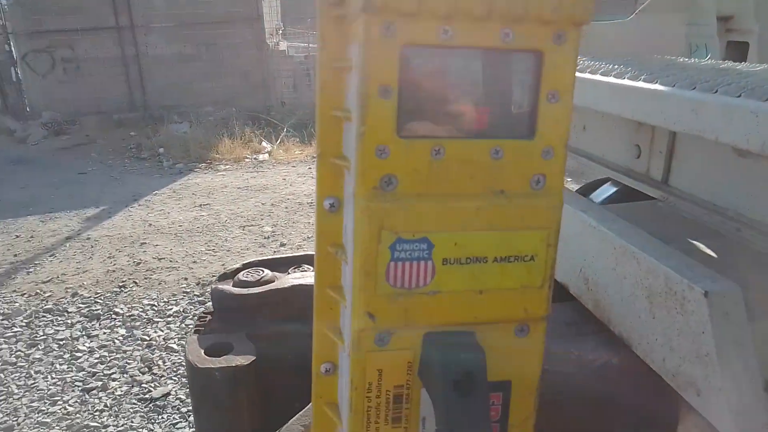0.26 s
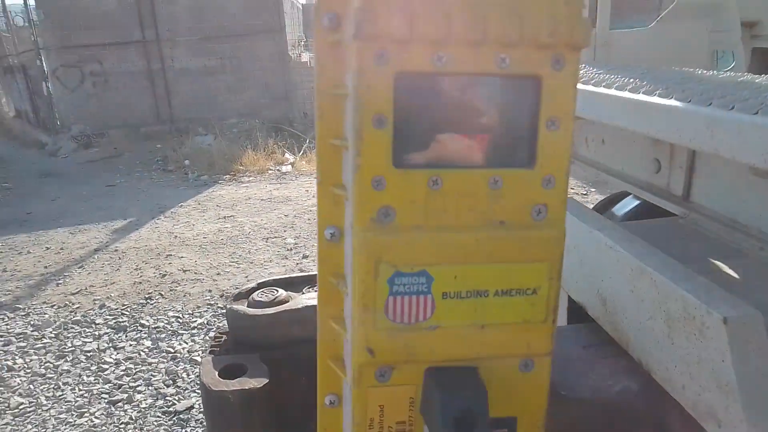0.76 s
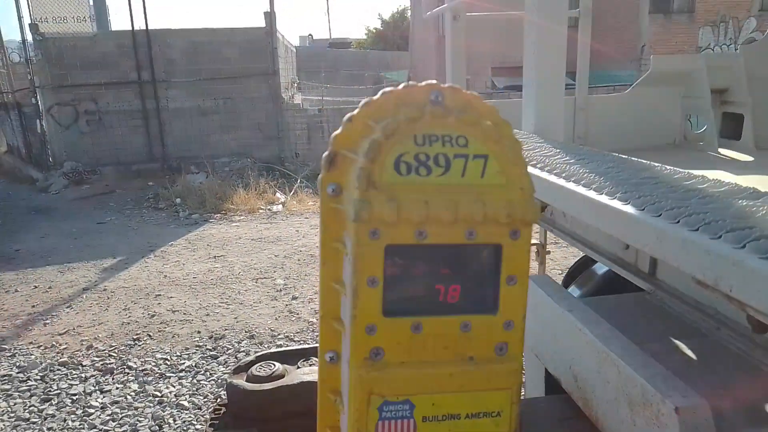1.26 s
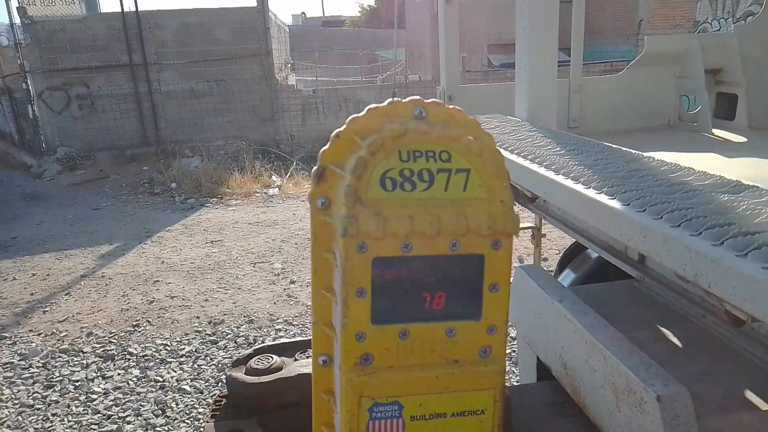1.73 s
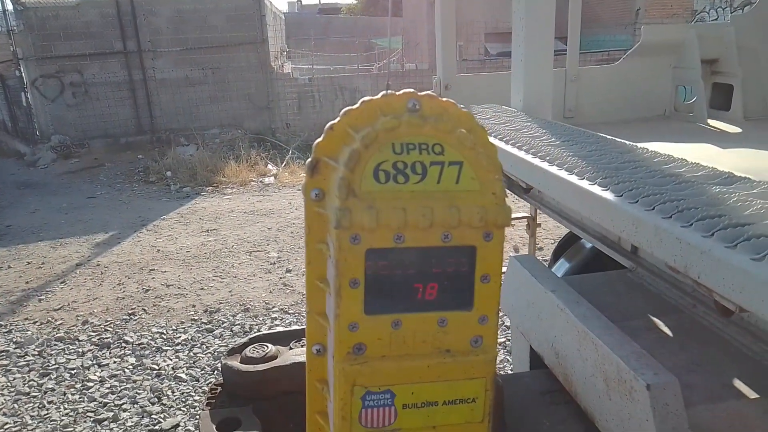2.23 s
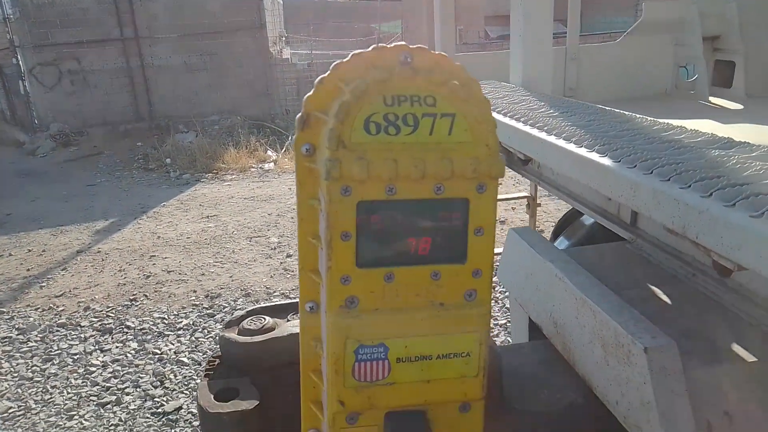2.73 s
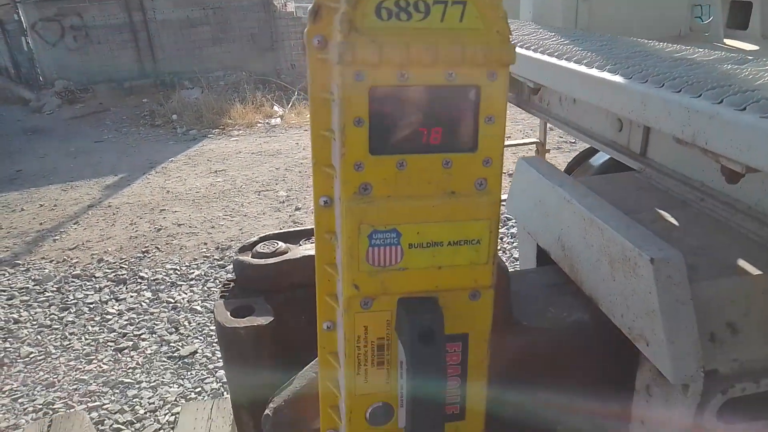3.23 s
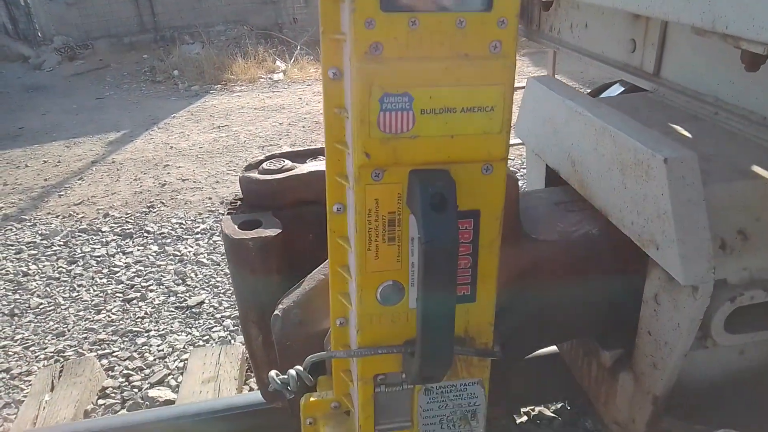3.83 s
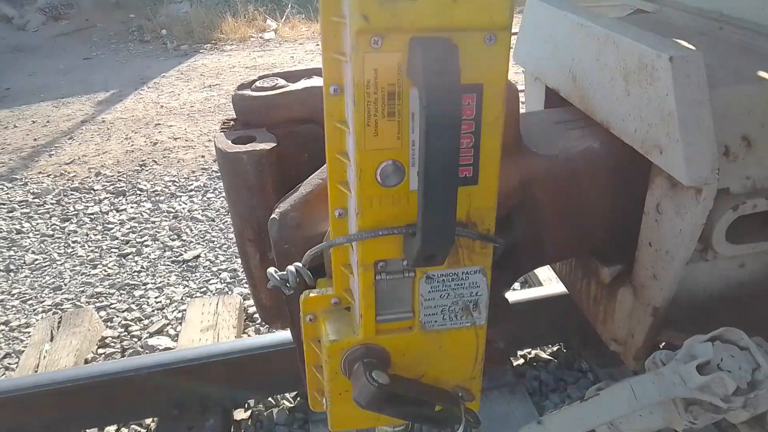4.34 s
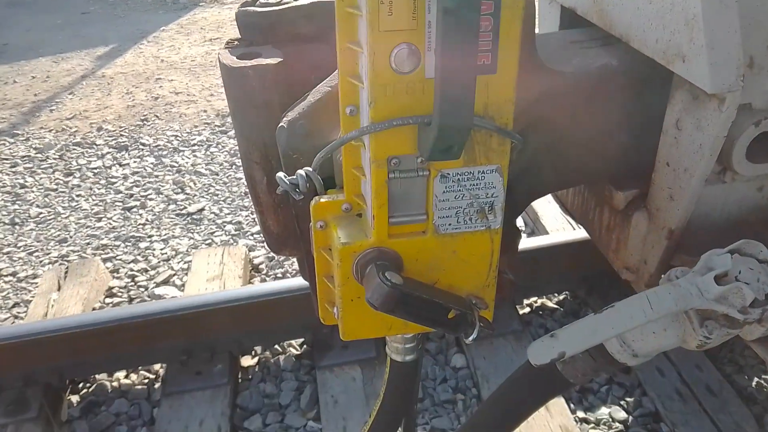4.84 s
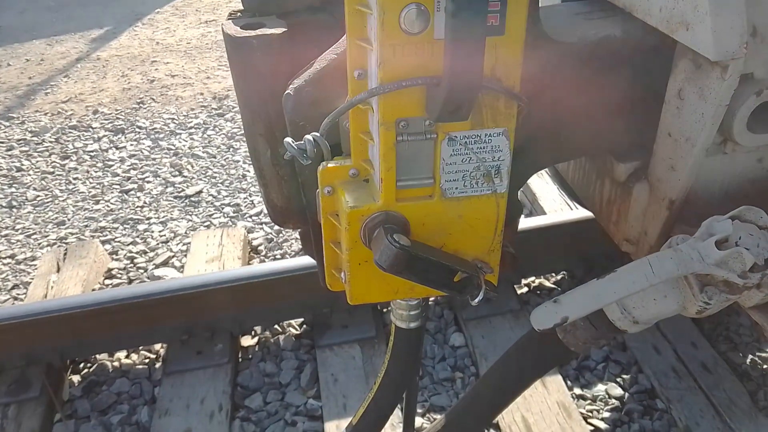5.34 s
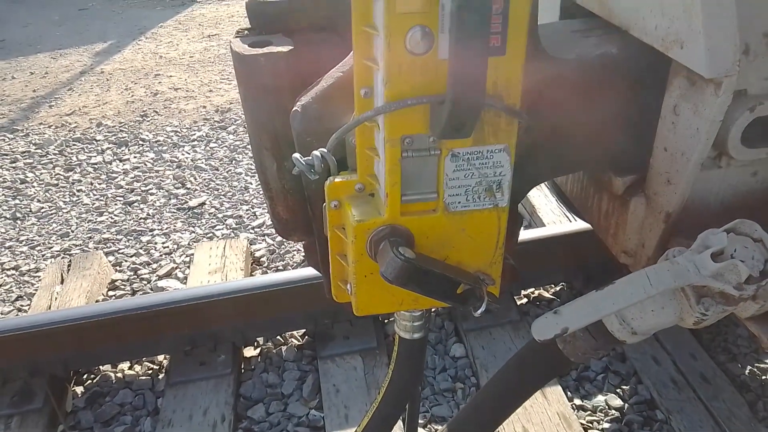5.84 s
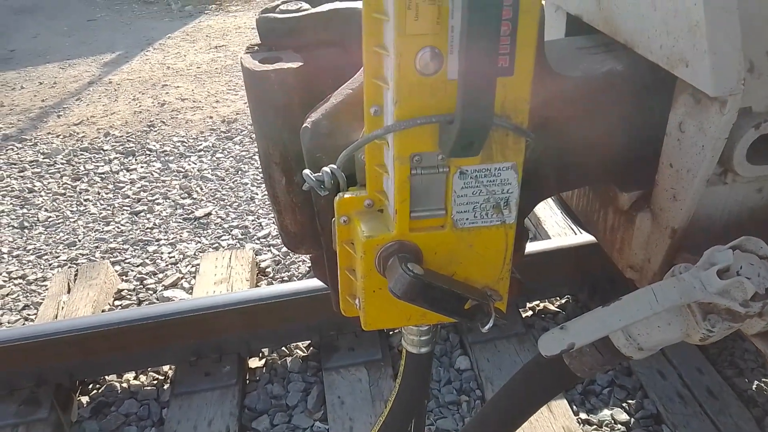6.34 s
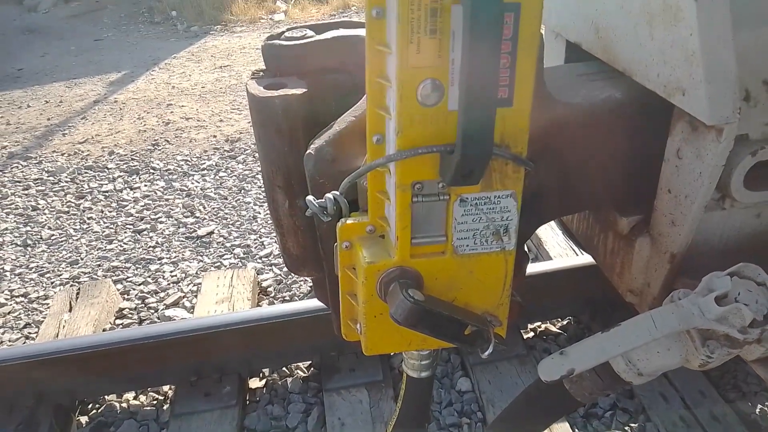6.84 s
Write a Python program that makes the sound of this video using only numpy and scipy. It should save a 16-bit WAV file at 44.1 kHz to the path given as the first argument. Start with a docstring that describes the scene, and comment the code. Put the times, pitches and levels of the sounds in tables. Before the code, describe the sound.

Outdoors beside a parked freight train, a small air turbine in a metal box gives a thin, steady high whine over a continuous muffled rush of exhaust air. The whine swells and weakens as the handheld microphone moves close around the box, nearly vanishing just before the middle, then returning. Faint treble hiss flickers above; low yard rumble and a wavering distant engine hum lie underneath.

```python
"""A small air turbine whines in a box at the end of a freight train, run by brake-pipe air, heard from a moving hand.
The 25 blades sing as a sine with a fainter neighbour, amid noise beside the tone and faint shaft harmonics.
The exhaust is broad rushing noise, muffled steeply above a wandering edge; over it lies a faint treble hiss.
Narrow strips of the sound surface and sink. Behind, the yard rumbles as low noise and a distant engine
hums as two wavering sines."""
import sys
import numpy as np
from scipy import signal
from scipy.io import wavfile
from scipy.ndimage import uniform_filter1d, map_coordinates

SR = 44100
rng = np.random.default_rng(int(sys.argv[2]) if len(sys.argv) > 2 else 0)


def generate_wav(signal):
    """Clip the signal to [-1, 1] and save it as 16-bit WAV at the path in sys.argv[1]."""
    frames = np.transpose(np.atleast_2d(signal))
    scaled = np.clip(frames, -1, 1) * 32767
    pcm = np.round(scaled).astype(np.int16)
    wavfile.write(sys.argv[1], SR, pcm)


N = 312228  # length [samples]
FRAME = 2048  # analysis frame [samples]
HOP_OVERLAP = FRAME * 3 // 4
BIN_HZ = SR / FRAME
HZ = np.arange(FRAME // 2 + 1)[:, None] * BIN_HZ + 1e-3  # just above zero, so its log is finite


def undb(db):
    """Turn decibels into gain."""
    return 10 ** (np.asarray(db) / 20)


def columns(table, s):
    """Read every column after the time column at times s, in straight lines between points."""
    table = np.array(table)
    return [np.interp(s, table[:, 0], column) for column in table.T[1:]]


def colour(table):
    """Read a spectrum table at every analysis frequency, in dB over log frequency."""
    table = np.array(table)
    return np.interp(np.log(HZ), np.log(table[:, 0]), table[:, 1])


def shape(x, db_of):
    """Filter x by a gain in dB that depends on frequency and time."""
    _, s, spectrum = signal.stft(x, SR, nperseg=FRAME, noverlap=HOP_OVERLAP)
    shaped = spectrum * undb(db_of(s))
    return signal.istft(shaped, SR, nperseg=FRAME, noverlap=HOP_OVERLAP)[1][:N]


def white():
    """Make flat noise of power 1 in each Hz."""
    return rng.standard_normal(N) * np.sqrt(SR / 2)


def walk(rate):
    """Wander in straight ramps between random levels, rate of them a second."""
    k = int(SR / rate)
    held = np.repeat(rng.standard_normal(N // k + 1), k)
    return 1.072 * uniform_filter1d(held, k)[:N]


BLOTCH_HZ, BLOTCH_S = 90, .2  # patch size [Hz], [s]


def blotches(s, spread_db):
    """Mottle noise with random dB over frequency and time, alike within a small patch."""
    rows, cols = int(SR / 2 / BLOTCH_HZ) + 2, int(s[-1] / BLOTCH_S) + 2
    grid = rng.standard_normal((rows, cols))
    return spread_db * map_coordinates(grid, np.broadcast_arrays(HZ / BLOTCH_HZ, s / BLOTCH_S), order=1)


# colour of the yard rumble: (frequency [Hz], level [dB per Hz])
RUMBLE_COLOUR = [(20, -89), (40, -77), (80, -66), (120, -56.5), (140, -58.5), (190, -62.5), (220, -59.5),
                 (270, -67), (400, -78), (1500, -130)]


def yard_rumble():
    """Low blotchy noise: the blurred bed of the distant yard."""
    return shape(white(), lambda s: colour(RUMBLE_COLOUR) + blotches(s, spread_db=4.0))


# upper engine hum, before its waver: (time [s], level [dB])
UPPER_HUM_LEVEL = [(0, -54), (1.2, -53), (1.8, -42), (2.25, -49), (2.5, -35.5), (3.2, -37), (3.7, -41.5),
                   (3.9, -50), (4.5, -40.5), (5.1, -48), (5.4, -40.5), (6.1, -47.5), (7.08, -43)]
# bumps added to the lower engine hum: (peak time [s], time from peak to 1/e [s], level [dB])
LOWER_HUM_SWELLS = [(.3, 0.4, -37), (2.11, 0.21, -35), (2.7, 0.17, -47), (3.57, .1, -43)]
UPPER_HUM_START_HZ, UPPER_HUM_SAG_HZ_PER_S, UPPER_HUM_WAVER_DB = 168, 1.7, 1.5
LOWER_HUM_HZ, LOWER_HUM_WAVER_HZ, LOWER_HUM_BASE_DB = 118, 7, -48.5


def distant_engine(t):
    """Two sines: the upper sags in pitch and wavers in level, the lower wavers in pitch and swells."""
    upper_hz = UPPER_HUM_START_HZ - UPPER_HUM_SAG_HZ_PER_S * t
    upper = np.sin(2 * np.pi * np.cumsum(upper_hz) / SR)
    upper_gain = undb(columns(UPPER_HUM_LEVEL, t)[0] + UPPER_HUM_WAVER_DB * walk(6))
    lower_hz = LOWER_HUM_HZ + LOWER_HUM_WAVER_HZ * walk(12)
    lower = np.sin(2 * np.pi * np.cumsum(lower_hz) / SR)
    lower_gain = undb(LOWER_HUM_BASE_DB)
    for peak, half, db in LOWER_HUM_SWELLS:
        lower_gain = lower_gain + undb(db) * np.exp(-((t - peak) / half) ** 2)
    return np.sqrt(2) * (upper_gain * upper + lower_gain * lower)  # levels are RMS


# colour of the faint hiss: (frequency [Hz], level [dB per Hz])
HISS_COLOUR = [(1500, -88), (2150, -90), (2900, -96.5), (3450, -91), (4700, -98), (5700, -101),
               (5950, -104), (6400, -98.5), (8700, -98.5), (9400, -102), (10150, -108), (11000, -103),
               (12000, -99), (16000, -100.5)]


def treble_hiss():
    """Faint treble air: noise, blotchy in pitch, that flickers a little as a whole."""
    flicker = undb(.7 * walk(24))
    return shape(white() * flicker, lambda s: colour(HISS_COLOUR) + blotches(s, spread_db=2.5))


# colour of the exhaust, relative only: (frequency [Hz], level [dB per Hz])
RUSH_COLOUR = [(150, -39), (260, -8), (391, -8.5), (598, -4.5), (649, -6), (891, 0), (993, 0.5), (1080, 2),
               (1900, -4), (2470, -16), (4180, -120)]
# overall exhaust level, before the muffling and blotches: (time [s], level [dB])
RUSH_LEVEL = [(0, -30), (1.56, -29), (3.8, -30), (4.4, -32), (5.2, -29.5), (5.6, -31.5), (7.08, -31)]
# wandering edge above which the noise is muffled: (time [s], frequency [Hz])
MUFFLE_EDGE = [(0, 1900), (.6, 1810), (1.05, 2044), (1.5, 2090), (1.95, 1980), (2.25, 2070), (2.75, 2006),
               (3.1, 1880), (4.25, 1850), (4.75, 1740), (5.7, 1790), (6.25, 1660), (6.75, 1850),
               (7.08, 1770)]
MUFFLE_HZ_PER_DB = 8  # each 8 Hz higher costs 1 dB


def exhaust_rush():
    """Exhaust air: broad rushing noise, muffled steeply above a wandering edge."""
    def db_of(s):
        fall_start_hz = columns(MUFFLE_EDGE, s)[0] - 90
        above_hz = np.maximum(HZ - fall_start_hz, 0)
        total_db = 10 * np.log10(np.sum(undb(2 * colour(RUSH_COLOUR))) * BIN_HZ)
        level = colour(RUSH_COLOUR) - total_db + columns(RUSH_LEVEL, s)[0]
        return level - above_hz / MUFFLE_HZ_PER_DB + blotches(s, spread_db=2.0)
    return shape(white(), db_of)


# narrow strips that surface (+) or sink (-): (start time [s], end time [s], centre [Hz], change [dB])
STRIP_MOVES = [(0, .95, 3340, 14), (0, .3, 3700, 13), (0, .65, 6150, 24), (0, .65, 6880, 12),
               (0, .4, 11310, 16), (0, 0.597, 12370, 23), (0, .75, 15660, 21), (.55, .88, 8930, 17),
               (.68, 1.12, 11290, 19), (0.744, 1.195, 380, -7), (.85, 1.28, 12300, 16),
               (1.2, 2.2, 7590, 10), (1.85, 2.5, 8905, 18.5), (2.4, 2.95, 6180, 23),
               (2.55, 3.22, 7570, 22.5), (2.545, 3.875, 11515, 24), (2.6, 7.1, 6900, 12),
               (2.6, 4.2, 3360, 8.5), (3.45, 7.1, 4040, 5.5), (5.2, 5.6, 4020, 7), (6.5, 6.8, 4000, 7),
               (3.55, 4.1, 1900, -2), (3.6, 4.3, 60, -2.5), (5.3, 6.1, 70, 2.5), (1.7, 1.9, 330, -6),
               (5.9, 6.5, 1750, -3), (3.1, 7.1, 5790, -7), (5.55, 6.0, 470, 4.5), (6.65, 6.85, 487, 7),
               (0, .2, 400, -6.5), (3.78, 4.02, 2090, 15), (3.65, 4.08, 7640, 20),
               (3.802, 4.35, 11300, 21.5), (4.075, 4.45, 484, -12.5), (4.595, 5.148, 458, -10),
               (4.35, 4.85, 8860, 14), (4.448, 4.85, 12560, 20), (4.4, 5.9, 15500, 18),
               (5.75, 6.5, 1883, 18), (6.0, 6.6, 348, -2), (6.8, 7.1, 11320, 14)]
STRIP_WIDTH_HZ, FADE_S = 162, 0.16  # width is two standard deviations; fades centre on start and end


def strips(s):
    """Gain in dB of strips that surface and sink, each fluttering on its own."""
    db = 0
    flutter = uniform_filter1d(rng.standard_normal((len(STRIP_MOVES), len(s))), size=8)
    for (start, end, hz, change_db), shake in zip(STRIP_MOVES, flutter):
        fade = np.clip(np.minimum(s - start, end - s) / FADE_S + .5, 0, 1)
        bell = np.exp(-(2 * (HZ - hz) / STRIP_WIDTH_HZ) ** 2 / 2)
        db = db + change_db * fade * (1 + 0.38 * shake) * bell
    return db


# pitch of the blade tone, shifted slightly by the moving hand: (time [s], frequency [Hz])
BLADE_PITCH = [(0, 5431.4), (.5, 5430.3), (3.8, 5433), (4.5, 5431), (6.4, 5431.1), (7.08, 5430)]
BLADES = 25


def shaft_turn(t):
    """Shaft angle in radians: one turn passes every blade once."""
    return 2 * np.pi * np.cumsum(columns(BLADE_PITCH, t)[0]) / SR / BLADES


# faint shaft harmonics, about which each wanders: (multiple of shaft rate, level [dB])
SHAFT_HARMONICS = [(1, -52), (3, -50), (4, -47), (6, -46), (15, -79), (17, -77), (22, -78), (23, -80),
                   (26, -67), (31, -80), (35, -80), (41, -80), (43, -80), (47, -84), (49, -78), (50, -74),
                   (51, -82), (52, -80), (53, -80), (54, -81), (56, -79), (57, -81), (58, -82), (60, -81),
                   (61, -80), (72, -82)]


def shaft_harmonics(turn):
    """Sines on whole multiples of the shaft rate, each wandering in level."""
    total = 0
    for multiple, db in SHAFT_HARMONICS:
        start_phase = 2 * np.pi * rng.random()
        total = total + undb(db + 2.7 * walk(3.06)) * np.sin(multiple * turn + start_phase)
    return np.sqrt(2) * total  # levels are RMS


# noise bands just below and just above the blade tone: (low [Hz], high [Hz])
SIDE_BANDS = [(5150, 5378), (5430, 5593)]
# beside the blade tone; noise levels are for the band alone, before blotches:
# (time [s], next lower shaft harmonic level [dB], noise below level [dB], noise above level [dB])
BESIDE_TONE = [(0, -57, -59, -54), (.3, -58, -53, -49), (.8, -41, -49, -59), (1.0, -42, -53, -47),
               (1.6, -43, -52, -48), (2.2, -50, -49, -57), (2.6, -55, -51, -57), (2.95, -41, -48, -55),
               (3.4, -44.5, -50, -66), (3.75, -75, -64, -68), (4.05, -72, -62, -54), (4.45, -66, -59, -64),
               (4.9, -46.5, -51, -65), (5.5, -49, -50, -59), (6.0, -50, -54, -51), (7.08, -49, -52, -55)]
SKIRT_HZ_PER_DB = 7  # each 7 Hz outside a band costs 1 dB


def tone_side_noise():
    """Two blotchy noise bands beside the blade tone, with steep skirts."""
    def db_of(s):
        power = 0
        for (low, high), db in zip(SIDE_BANDS, columns(BESIDE_TONE, s)[1:]):
            outside_hz = np.maximum(np.maximum(low - HZ, HZ - high), 0)
            power = power + undb(2 * (db - outside_hz / SKIRT_HZ_PER_DB)) / (high - low)
        return 10 * np.log10(power) + blotches(s, spread_db=2.0)
    return shape(white(), db_of)


# blade tone, swelling and dropping out as the hand moves about the box: (time [s], level [dB])
TONE_LEVEL = [(0, -30), (.22, -26.5), (.39, -27.5), (.52, -35.5), (.66, -28), (.79, -26), (.92, -27.5),
              (1.69, -28.5), (2.35, -33.5), (2.74, -26), (3.08, -32.5), (3.2, -38.5), (3.3, -53),
              (3.4, -57), (3.48, -39), (3.55, -42), (3.63, -56), (3.72, -58), (3.8, -39), (3.88, -34.5),
              (4.1, -32), (4.22, -36), (4.33, -28.5), (4.7, -29), (5.4, -27.5), (6.05, -29), (6.49, -27),
              (6.96, -32), (7.08, -29)]


def blade_whine(t, turn):
    """Blades passing make a sine at 25 times the shaft rate; the 24th harmonic sings beside it."""
    tone_gain = undb(columns(TONE_LEVEL, t)[0] + .3 * walk(25))  # slight unsteadiness
    next_gain = undb(columns(BESIDE_TONE, t)[0])
    tones = tone_gain * np.sin(BLADES * turn) + next_gain * np.sin((BLADES - 1) * turn)
    return np.sqrt(2) * tones  # levels are RMS


def scene():
    """Mix all sources at one microphone; the strips colour everything but the whine."""
    t = np.arange(N) / SR
    turn = shaft_turn(t)
    background = yard_rumble() + distant_engine(t)
    noises = treble_hiss() + exhaust_rush() + tone_side_noise()
    bed = background + noises + shaft_harmonics(turn)
    return (shape(bed, strips) + blade_whine(t, turn))[None]


def record(dry):
    """The recorder cuts the deep bass gently and the top sharply."""
    low_cut = signal.butter(3, 45, "high", fs=SR, output="sos")
    top_cut = signal.ellip(14, .3, 80, 15780, fs=SR, output="sos")
    return signal.sosfilt(top_cut, signal.sosfilt(low_cut, dry))


dry = scene()
out = record(dry)
generate_wav(out)
```